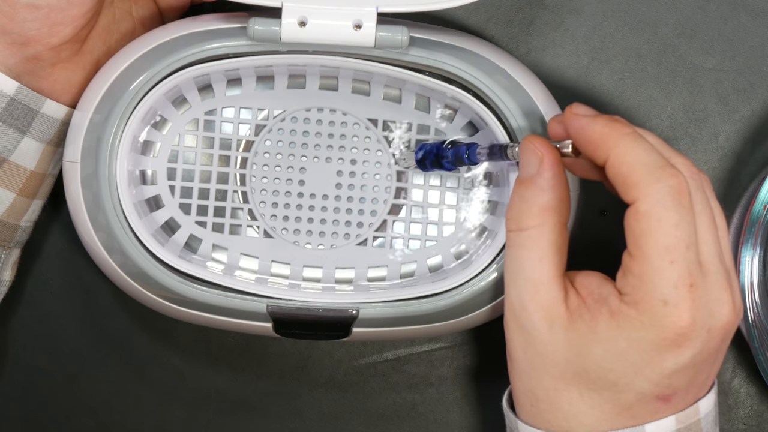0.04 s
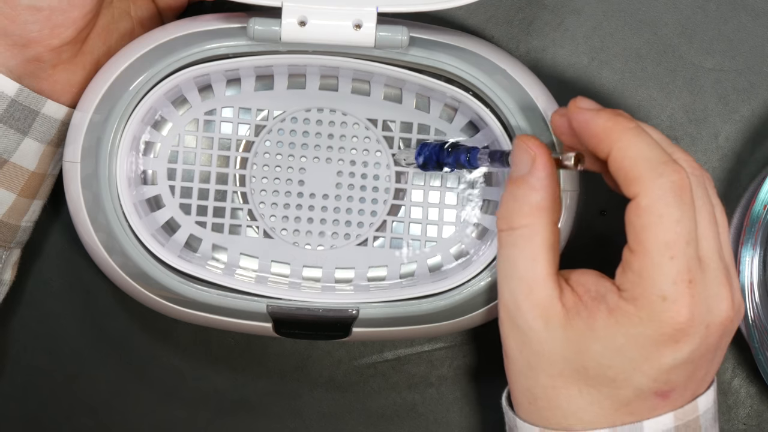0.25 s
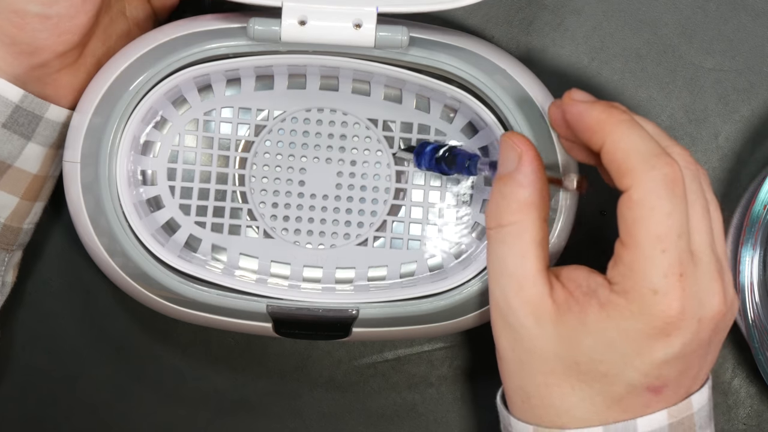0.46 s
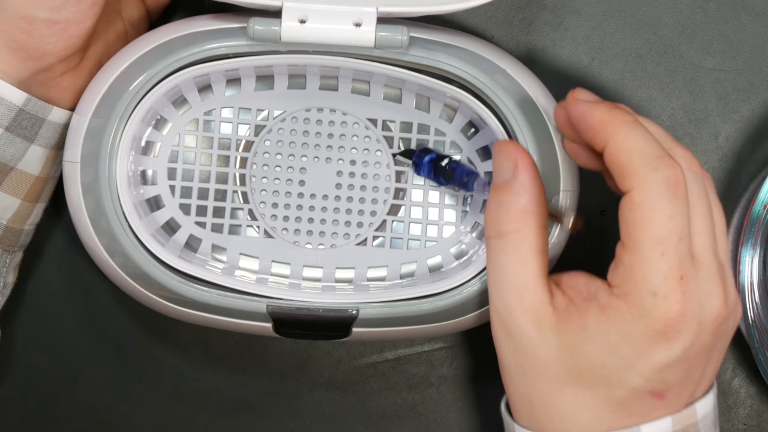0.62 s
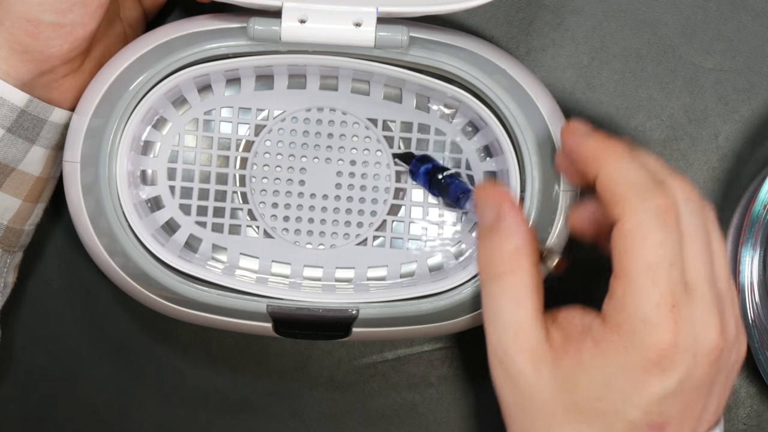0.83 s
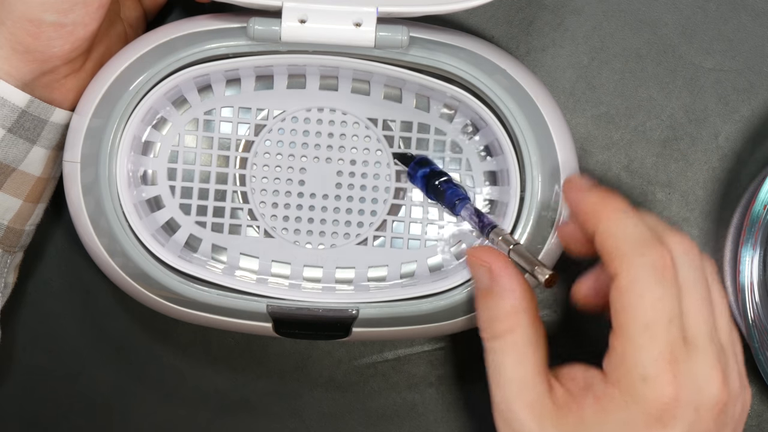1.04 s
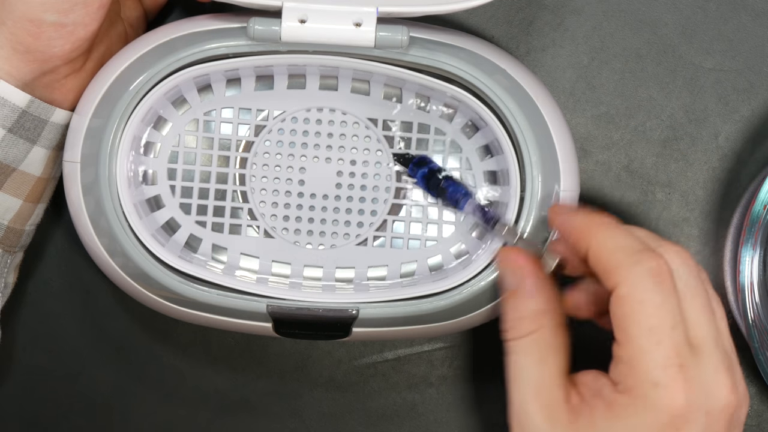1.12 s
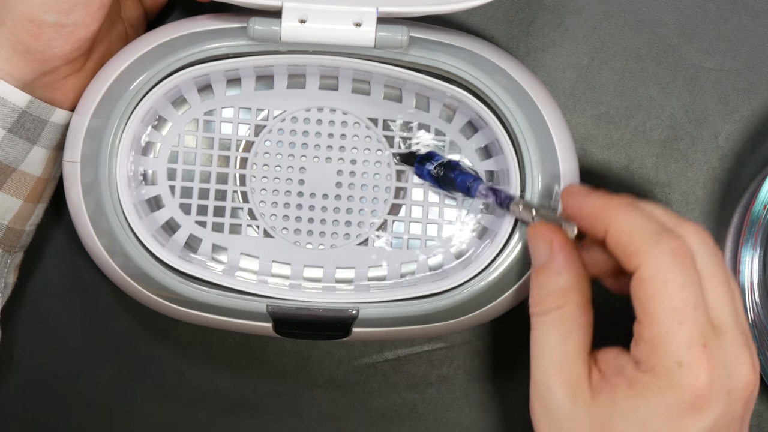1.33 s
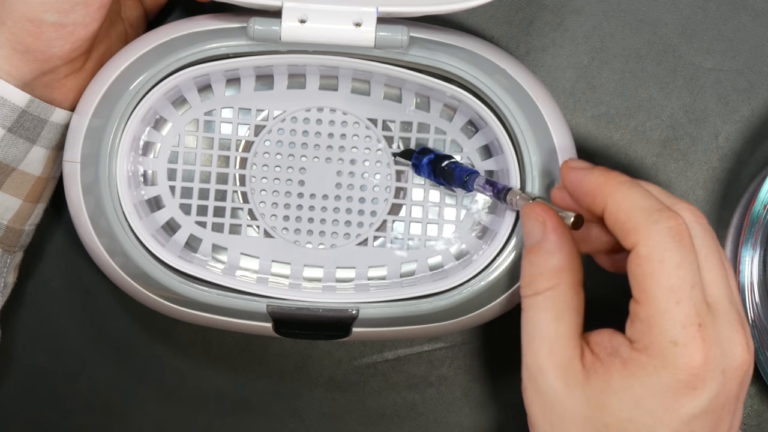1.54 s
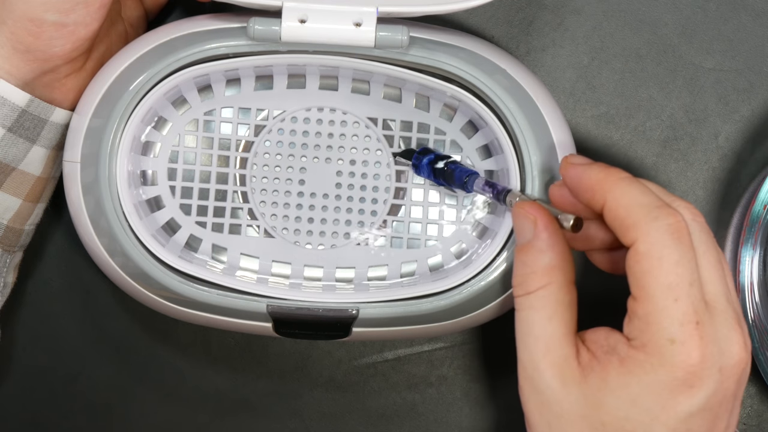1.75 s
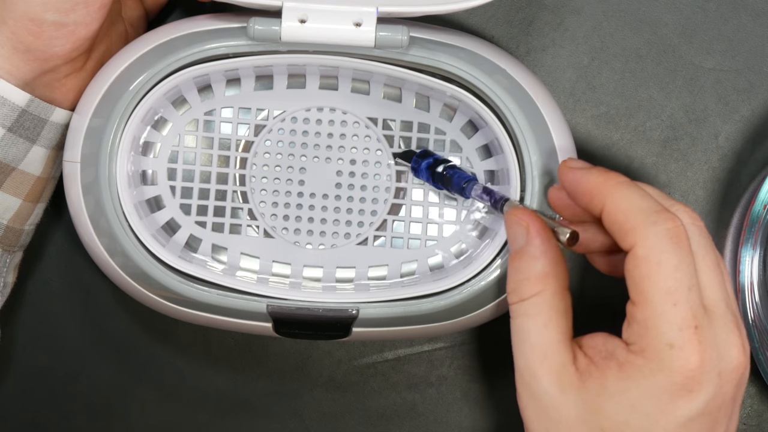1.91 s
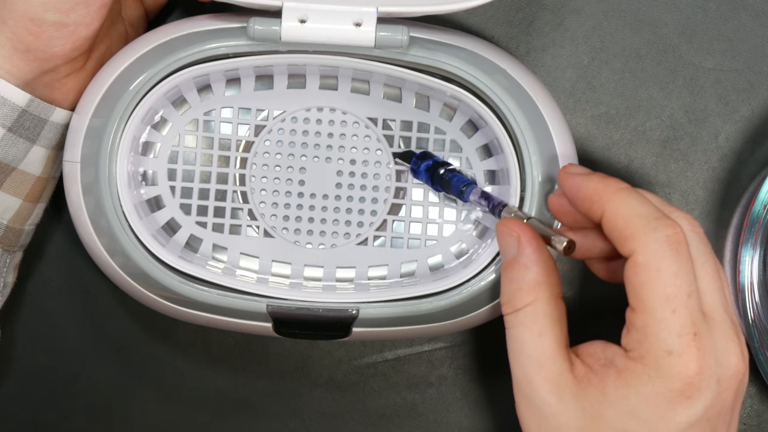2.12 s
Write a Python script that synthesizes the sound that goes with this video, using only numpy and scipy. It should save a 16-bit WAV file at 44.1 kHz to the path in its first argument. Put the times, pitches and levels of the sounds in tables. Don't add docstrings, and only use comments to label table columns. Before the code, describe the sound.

A small ultrasonic bath buzzes raspily at mains rate, a few light taps and rattles over it

```python
import sys
import numpy as np
from scipy import signal
from scipy.fft import rfft, irfft
from scipy.io import wavfile
from scipy.ndimage import uniform_filter1d

SR = 44100
rng = np.random.default_rng(int(sys.argv[2]) if len(sys.argv) > 2 else 0)


def volts(x):
    e = np.asarray(x, float) / 20
    return 10 ** e


def output_pcm(signal):
    pcm = np.clip(np.atleast_2d(signal).T, -1, 1) * 32767
    wavfile.write(sys.argv[1], SR, np.round(pcm).astype(np.int16))


N = 95829
T = np.arange(N) / SR
MAINS_HZ = 60.03
CYCLES = int(N / SR * MAINS_HZ) + 3

# f/Hz, density/dB per Hz
ROOM_SPECTRUM = [(15, -33), (25, 3), (59, 0), (139, -1), (204, -6), (297, 1), (539, -19), (600, -31),
                 (780, -37), (1320, -120)]
# multiple of mains, level/dB
HUM = [(1, -93.5), (2, -92.5)]
# t/s, level/dB, f/Hz, swell/s, t60/s
KNOCKS = [(.003, -39.5, 450, 0.0044, .06), (.010, -36, 775, 0.0039, 0.078), (.012, -65, 298, 0.0023, 0.55),
          (.014, -45, 583, 0.0085, 0.14), (.367, -56, 566, .002, 0.055), (.465, -59, 101.9, .01, .1),
          (.512, -62, 60, .006, 0.11), (.513, -48.5, 134, .006, 0.063), (0.523, -55, 356.4, .005, 0.066),
          (.68, -66, 150, 0.022, 0.11), (0.773, -52.5, 127, 0.017, 0.13), (1.152, -59, 134, 0.0088, 0.081),
          (1.336, -50, 770, 0.0054, .07), (1.337, -35, 2320, 0.0018, 0.029),
          (1.404, -37.5, 2240, .003, 0.044), (1.408, -44, 684, 0.0059, 0.061),
          (1.430, -36, 470, .006, 0.054), (1.434, -47, 272, 0.0035, 0.1), (1.440, -41, 600, 0.0061, 0.096),
          (1.443, -44, 944, 0.003, 0.079), (1.472, -39, 2300, 0.0014, .02),
          (1.488, -32, 2280, 0.00086, 0.021), (1.495, -49, 126, 0.027, .15),
          (1.53, -48.5, 129.6, 0.015, 0.18), (1.552, -44.5, 1190, 0.0018, 0.038)]
# f/Hz, density/dB per Hz
RATTLE_SPECTRUM = [(140, -64), (240, -21), (305, -21), (930, -13), (1010, -11), (1110, -6.5), (1370, -13),
                   (1860, -1.5), (3200, -6), (4160, -42), (7040, -120)]
# t/s, rattle level/dB
GRIP = [(0, -44.5), (.1, -57.5), (.33, -62.5), (.37, -55.5), (.52, -52), (.66, -51.5), (.78, -54),
        (.81, -67.5), (1.13, -72), (1.17, -62.5), (1.29, -72), (1.33, -56), (1.45, -53), (1.59, -58.5),
        (1.62, -69.5), (1.85, -68), (2.0, -63), (2.17, -71)]
# f/Hz, level/dB, t60/s, delay after drive start/ms
TANK_MODES = [(3875, 12, 0.0099, 1.2045), (4080, 6, 0.013, 1.601), (4230, -0.5, 0.027, 4),
              (4640, -4, 0.033, 2.5), (3182, -8.5, 0.055, 1.933), (3518, -8, 0.05, 3.0),
              (2802, -13.5, .03, 4), (2556, -20.5, 0.15, 1.532), (2300, -14.5, 0.059, 3.6),
              (1829, -17, 0.084, .5), (1675, -34.5, 0.13, 4.92), (5860, -27, .012, 2.5),
              (6200, -25, 0.026, 5.3), (3990, -2, .04, 3.9)]
# t/s, bubble level/dB, tank ring level/dB
DRIVE = [(0, -24.5, -47), (.16, -25.5, -36.5), (.31, -25, -35.5), (.54, -23.5, -33.5), (.75, -25, -37.5),
         (.91, -26, -40.5), (1.07, -26, -40), (1.2, -25, -41), (1.41, -23.5, -33), (1.59, -25, -38.5),
         (1.63, -27.5, -40.5), (1.70, -28, -43), (1.74, -25.5, -39.5), (1.94, -25, -35.5),
         (2.07, -23.5, -34), (2.17, -26.5, -37)]
# t/s, extra level/dB
FIERCE_BURSTS = [(.038, 2), (.105, 4), (.172, 2), (.272, 1.5), (.405, 2.5), (.472, -1), (.538, -1),
                 (.572, 1), (.888, 1), (1.022, 0.5), (1.072, 0), (1.288, -0.5), (1.438, -2), (1.472, 1.5),
                 (1.555, 1.5), (1.572, 5.5), (1.588, 3), (1.605, 2.5), (1.722, 8), (1.872, 3), (1.955, 6.5),
                 (2.022, 3), (2.038, 3.5), (2.155, 3.5)]
# f/Hz, density/dB per Hz
FIZZ_SPECTRUM = [(710, -49), (1200, -31.5), (1850, -25.5), (2920, -17.5), (3870, -12), (5470, -14.5),
                 (10700, -2.5), (13200, 0), (16000, -7)]
# f/Hz, width/Hz, lift/dB
BATH_MODES = [(3720, 300, -2.5), (6035, 360, 7.5), (7250, 550, 4), (9970, 350, 4), (10680, 910, 5),
              (13800, 370, -6.5), (13500, 1300, 3.5)]
# f/Hz, level/dB
AFTER_HISS = [(1600, 2), (3000, 10), (5500, 7), (8000, 3), (11000, -6.5), (16000, 4)]


def rms_one(x):
    return x / np.sqrt(np.mean(x ** 2) + 1e-20)


def control(rows, index):
    table = np.array(rows)
    return np.interp(T, table[:, 0], table[:, index])


def colour(x, points, lifts=()):
    hz = np.maximum(np.fft.rfftfreq(len(x), 1 / SR), 1)
    point_hz, point_db = np.array(points).T
    db = np.interp(np.log(hz), np.log(point_hz), point_db)
    db = db - 18 * np.maximum(np.log2(point_hz[0] / hz), 0)
    db = db - 18 * np.maximum(np.log2(hz / point_hz[-1]), 0)
    for mode_hz, width_hz, lift_db in lifts:
        db = db + lift_db / (1 + (2 * (hz - mode_hz) / width_hz) ** 2)
    return rms_one(irfft(rfft(x) * volts(db), len(x)))


def slow(count, cycles):
    r = np.exp(-1 / cycles)
    noise = rng.standard_normal((count, CYCLES + 50))
    return signal.lfilter([np.sqrt(1 - r * r)], [1, -r], noise)[:, 50:]


def band_noise(noise, order, low_hz, high_hz):
    sos = signal.butter(order, [low_hz, high_hz], "band", fs=SR, output="sos")
    return signal.sosfilt(sos, noise)


def room():
    room_db = -86.5
    hum = sum(volts(db + 9) * np.sin(2 * np.pi * k * MAINS_HZ * T) for k, db in HUM)
    return volts(room_db) * colour(rng.standard_normal(N), ROOM_SPECTRUM) + hum


def knocks():
    base_q, pure_per_s = 1.7, 4.5
    scuff_db, scuff_top_hz = -18.5, 1520
    out, t = np.zeros(N + SR), np.arange(SR // 2) / SR
    for onset_s, db, hz, swell_s, t60_s in KNOCKS:
        q = base_q * (1 + (hz / 1200) ** 2)
        half = 1 + .5 / q
        noise = rng.standard_normal((2, len(t)))
        body = rms_one(band_noise(noise[0], 2, hz / half, hz * half))
        scuff = rms_one(band_noise(noise[1], 1, 150, scuff_top_hz))
        tone = pure_per_s * t60_s * np.sin(2 * np.pi * hz * t)
        envelope = (1 - np.exp(-t / swell_s)) * volts(-60 * t / t60_s) * 2
        i = int(onset_s * SR)
        out[i:i + len(t)] += volts(db) * (body + tone + volts(scuff_db) * scuff) * envelope
    return out[:N]


def rattle():
    rattle_db, loose = 8.5, 0.5
    turn = T * MAINS_HZ
    size = int(SR / MAINS_HZ) + 1
    place = ((turn % 1) * (size - 1)).astype(int)
    weights = slow(count=3, cycles=5.0) * [[.4], [.5], [.5]] + [[1], [0], [0]]
    chatter = np.zeros(N)
    for weight in weights:
        pattern = rng.standard_normal(size)
        chatter += pattern[place] * np.interp(turn, np.arange(CYCLES), weight)
    chatter += loose * rng.standard_normal(N)
    return volts(rattle_db + control(GRIP, index=1)) * colour(chatter, RATTLE_SPECTRUM)


def tank():
    tank_db, rise_s = -1, 0.00098
    spread_db, wander_db, jitter_s = 1.5, 2.0, .00002
    lead = SR // 10
    out, t = np.zeros(N), np.arange(SR // 5) / SR
    cycle_s = (np.arange(CYCLES) - 2) / MAINS_HZ
    wanders = slow(count=len(TANK_MODES), cycles=12.0)
    for (hz, db, t60_s, delay_ms), wander in zip(TANK_MODES, wanders):
        jolt_s = cycle_s + delay_ms / 1000 + jitter_s * rng.standard_normal(CYCLES)
        jolt_db = db + spread_db * rng.standard_normal(CYCLES) + wander_db * wander
        jolts = np.zeros(N + SR)
        jolts[np.round(jolt_s * SR).astype(int) + lead] = volts(jolt_db)
        ring = np.sin(2 * np.pi * hz * t) * volts(-60 * t / t60_s) * (1 - np.exp(-t / rise_s))
        out += signal.fftconvolve(jolts, ring)[lead:lead + N]
    return volts(tank_db + control(DRIVE, index=2)) * rms_one(out)


def bubbles():
    peak_s, rise_s, fall_s, pointed = .0055, 0.0028, 0.0037, 1.75
    grain_db, grains_per_s = 2.0, 14000
    spread_db, patchy_db, patch_cycles = .7, 1.6, 1.2
    follow_hz = 9300
    between_db = -16.5

    turn = (T - peak_s) * MAINS_HZ
    cycle = np.floor(turn + .35).astype(int)
    dt = (turn - cycle) / MAINS_HZ
    bell = np.exp(-np.abs(dt / np.where(dt < 0, rise_s, fall_s)) ** pointed)

    burst_db = spread_db * np.diff(rng.standard_normal(CYCLES + 1))
    for s, db in FIERCE_BURSTS:
        burst_db[int(round((s - peak_s) * MAINS_HZ))] = db
    strength_db = uniform_filter1d(burst_db[cycle] * np.sqrt(bell), size=60)

    size_db = grain_db * np.minimum(rng.exponential(1, N), 4)
    sizes = volts(size_db) * rng.choice([-1, 1], N)
    grains = rms_one(sizes * (rng.random(N) < grains_per_s / SR))
    spectrum = rfft(colour(grains * bell, FIZZ_SPECTRUM, BATH_MODES))
    hz = np.fft.rfftfreq(N, 1 / SR)

    edges_hz = 17000 * np.linspace(.18, 1, 33) ** 2
    fizz = np.zeros(N)
    for low, high, patch in zip(edges_hz, edges_hz[1:], slow(count=32, cycles=patch_cycles)):
        band = irfft(spectrum * ((hz >= low) & (hz < high)), N)
        tint_db = patchy_db * np.interp(turn, np.arange(CYCLES), patch)
        tint_db = tint_db + strength_db * min(1, low / follow_hz)
        fizz += band * volts(tint_db)

    hiss = colour(rng.standard_normal(N), FIZZ_SPECTRUM, BATH_MODES)
    hiss = colour(hiss, AFTER_HISS)
    return volts(control(DRIVE, index=1)) * (rms_one(fizz) + volts(between_db) * hiss)


def scene():
    return (room() + knocks() + rattle() + tank() + bubbles())[None]


def band_limit(x):
    return signal.sosfilt(signal.butter(12, 16870, fs=SR, output="sos"), x)


def record(dry):
    cutoff_hz = 15860
    over_hz = np.clip(np.fft.rfftfreq(N, 1 / SR) - cutoff_hz + 100, 0, 200)
    mix = irfft(rfft(dry) * volts(-over_hz ** 2 / 500), N)
    return band_limit(mix)


dry = scene()
out = record(dry)
output_pcm(out)
```